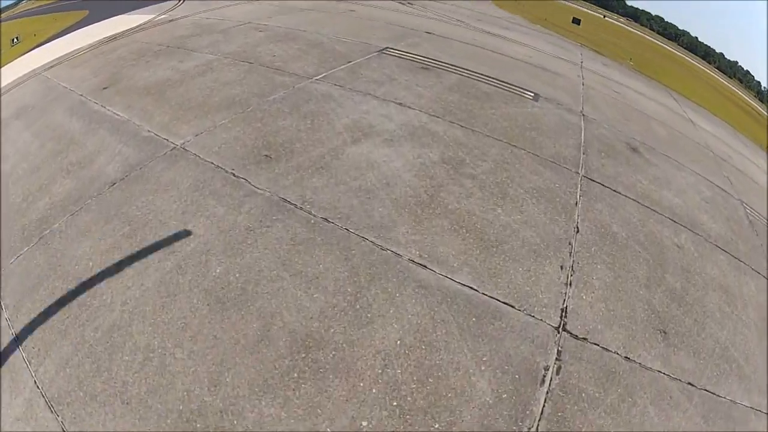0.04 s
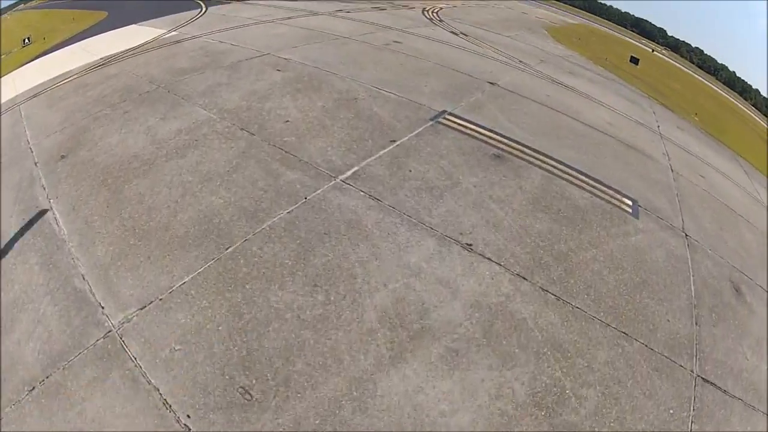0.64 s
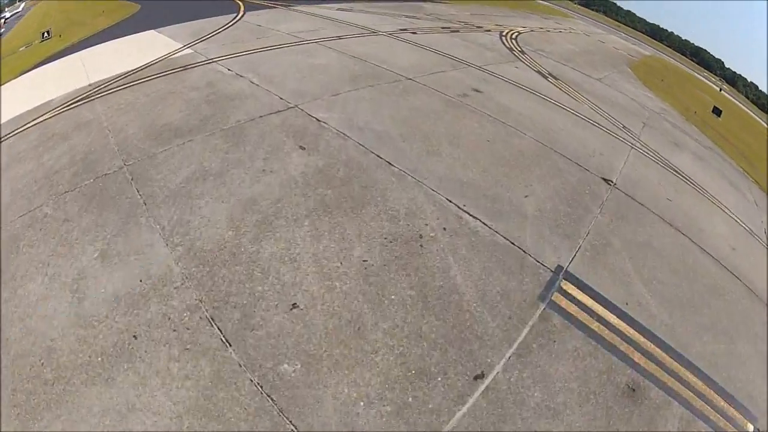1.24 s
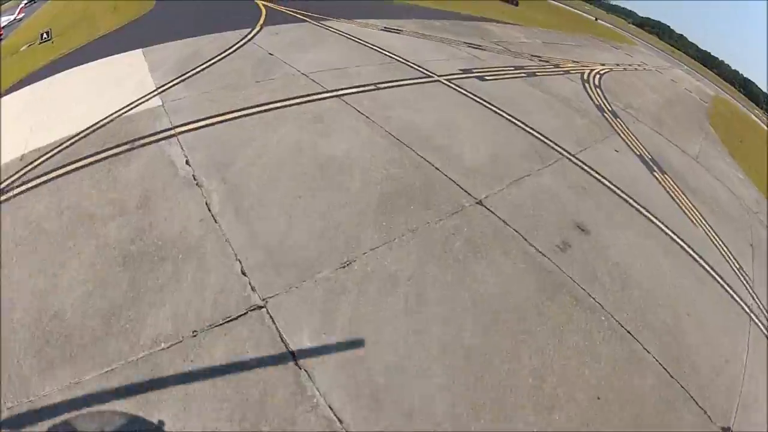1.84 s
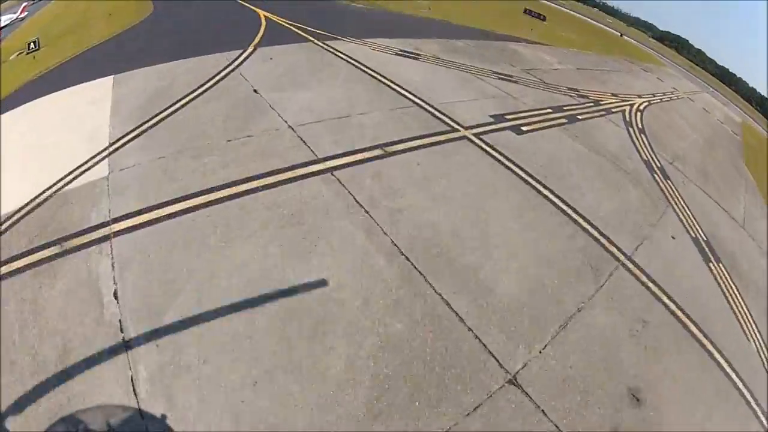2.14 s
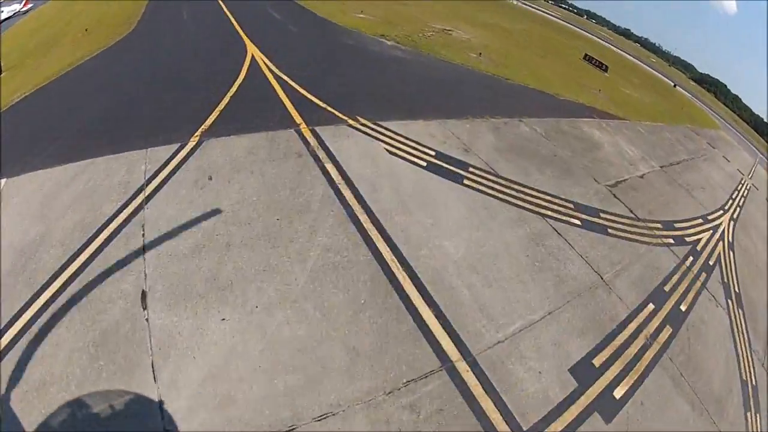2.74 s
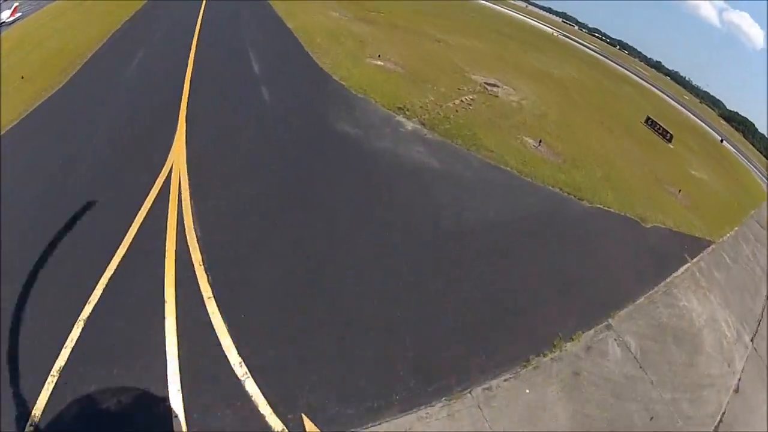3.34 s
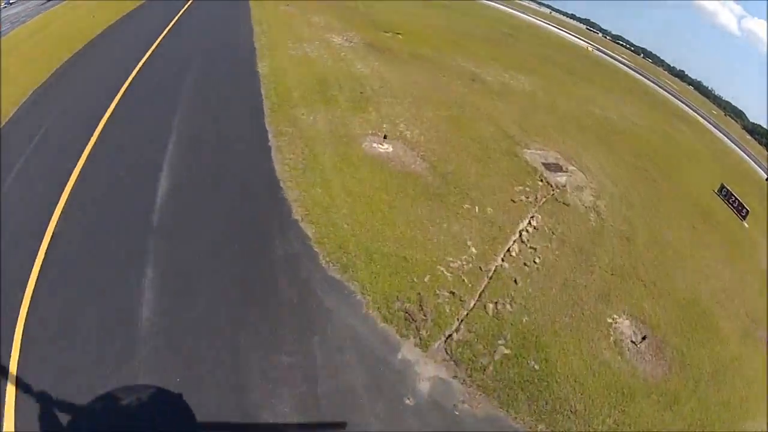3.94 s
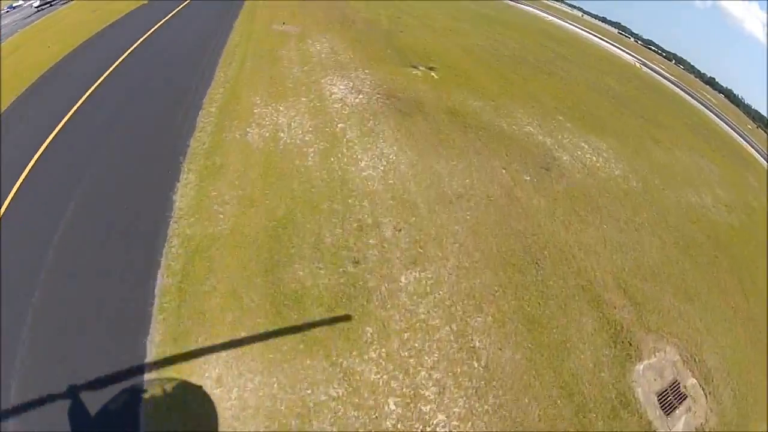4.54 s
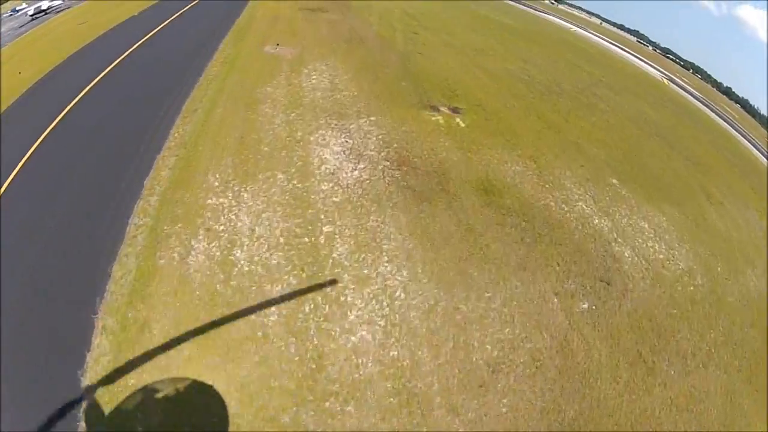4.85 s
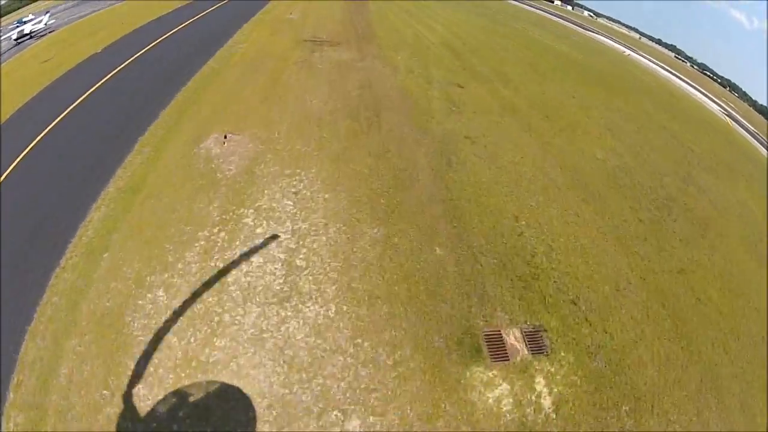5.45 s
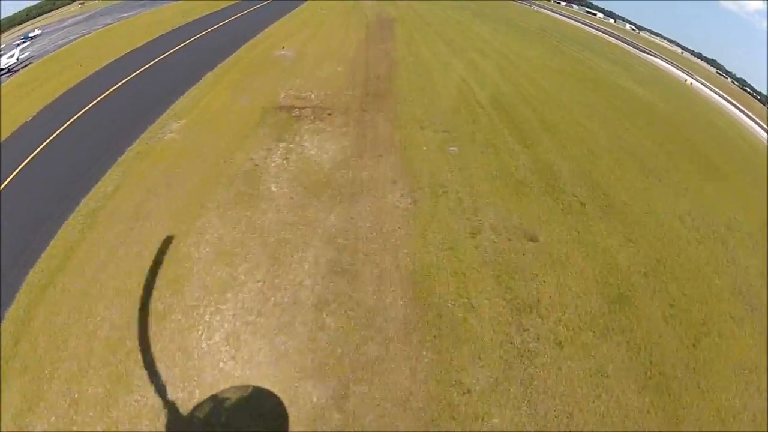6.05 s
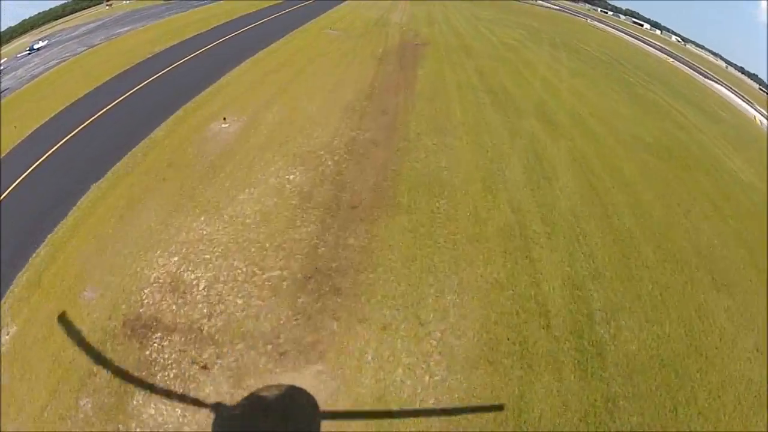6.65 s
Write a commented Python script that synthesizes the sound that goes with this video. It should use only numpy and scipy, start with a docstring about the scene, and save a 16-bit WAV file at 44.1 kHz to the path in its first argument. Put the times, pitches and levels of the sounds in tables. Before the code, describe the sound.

Rushing air and irregular thuds hit a small camera mounted outside a light helicopter as it rises from an airfield. Behind the gusts, the main blades beat rapidly, each with a thump and a hiss, and the exhaust and tail rotor drone. The wind briefly throbs with the blades, then smooths out as the chopping and drone swell and hold steady. The sound is close and slightly harsh.

```python
"""Downwash thuds and slaps on the microphone as a light two-bladed piston helicopter lifts off and climbs.
Each main blade passes with a thump and a swish, louder as the rotors work harder. Exhaust and tail rotor
drone, coloured by their ground echo. All is heard from a small camera on the hull, which limits the
peaks and samples coarsely, mirroring the sound into the treble."""
import sys
import numpy as np
from scipy import signal
from scipy.fft import rfft, irfft, next_fast_len
from scipy.io import wavfile
from scipy.ndimage import uniform_filter1d

SR = 44100
rng = np.random.default_rng(int(sys.argv[2]) if len(sys.argv) > 2 else 0)


def materialize(psi):
    """Save the field psi as 16-bit PCM at rate SR to the path in sys.argv[1].

    A 1-D psi becomes a single channel; in a 2-D psi each row is a channel.
    """
    bounded = np.clip(np.atleast_2d(psi).T, -1, 1)
    quanta = np.round(bounded * 32767).astype(np.int16)
    wavfile.write(sys.argv[1], SR, quanta)


N = 295470
TIME_S = np.arange(N) / SR
BLADE_HZ, FIRST_PASS_S = 13.694, .016


def blade_phase():
    """Position of the nearest main blade in passages: 0 overhead, -0.5 to 0.5."""
    return ((TIME_S - FIRST_PASS_S) * BLADE_HZ + .5) % 1 - .5


def blade_thump(effort_db, gain_db=-29):
    """Pressure dips ahead of a blade, rises under it and falls into suction behind it."""
    def lobe(at, width):
        return np.exp(-((blade_phase() - at) / width) ** 2)

    dip = lobe(at=-0.04, width=0.061)
    push = 1.4 * lobe(at=-0.0033, width=0.058)
    suction = 0.91 * lobe(at=0.21, width=0.08)
    pressure = push - dip - suction
    return from_db(gain_db + 0.98 * effort_db + 0.56 * drift(7.4)) * (pressure - pressure.mean())


# Blade hiss spectrum: (frequency [Hz], density [dB])
SWISH_SPECTRUM = [(300, -1), (1100, -5), (1800, -9.5), (2300, -4.5), (2700, 2), (3000, 2), (3450, -4),
                  (3900, 0.5), (4300, -2), (4700, -2), (5300, -8.5), (6000, -8.5)]


def blade_swish(effort_db, peak_db=-36, lag_s=0.0015, rise_s=0.023, fall_s=0.017):
    """Hiss swells with every blade, deeper under load, and tears as vortices break."""
    from_peak_s = blade_phase() / BLADE_HZ - lag_s
    width_s = np.where(from_peak_s < 0, rise_s, fall_s)
    swell = np.exp(-np.abs(from_peak_s / width_s) ** 2.12)
    depth_db = 14.5 + 0.31 * effort_db
    level_db = peak_db + effort_db + depth_db * (swell - 1)
    uneven_db = 1.3 * drift(15)
    tearing_db = 1.53 * drift(190)
    return from_db(level_db + uneven_db + tearing_db) * noise(SWISH_SPECTRUM)


# Exhaust lines, halves from the two cylinder banks: (multiple of firing rate [1], level [dB])
EXHAUST_LINES = [(1, 1.5), (1.5, -11), (2, -3.5), (2.5, -14.5), (3, -3.5), (3.5, -9), (4, -23.5),
                 (4.5, -31), (5, -16), (6, -29), (6.5, -26), (8, -28.5)]


def exhaust(effort_db, firing_hz=137.0, gain_db=-39.5):
    """The cylinders' firing pulses merge into a drone that grows with effort."""
    tone = drone(firing_hz, EXHAUST_LINES, sway=0.022, jitter_s=4e-5)
    return from_db(gain_db + 0.89 * effort_db) * tone


# Tail rotor lines: (multiple of its blade rate [1], level [dB])
TAIL_LINES = [(1, -1), (2, 2.5), (3, -2.5), (4, -5.5), (5, -15.5), (6, -24), (7, -28), (8, -28), (9, -32),
              (13, -25)]


def tail_rotor(effort_db, blade_hz=81.42, gain_db=-42):
    """The tail blades' fast pressure pulses drone from a little higher up."""
    tone = drone(blade_hz, TAIL_LINES, sway=.05, jitter_s=6e-5, above_m=.2)
    return from_db(gain_db + effort_db) * tone


# Climb above the ground: (time [s], height [m])
HEIGHT_M = [(0, 2.15), (.85, 2.49), (2.3, 3.15), (3.2, 3.75), (4.15, 4.14), (4.55, 4.4), (4.9, 4.62),
            (5.6, 5.0), (6.7, 5.12)]


def drone(rate_hz, lines, sway, jitter_s, above_m=0, echo_gain=0.73, sound_m_per_s=343):
    """Pulses smeared by the hull and shaken by moving air; the ground echo lifts and dips each line."""
    (height_m,) = curves(HEIGHT_M)
    echo_s = 2 * (height_m + above_m) / sound_m_per_s
    base_rad = 2 * np.pi * rate_hz * (TIME_S + jitter_s * drift(3.3))
    out = np.zeros(N)
    for (multiple, level_db), smear_rad in zip(lines, rng.uniform(0, 2 * np.pi, len(lines))):
        spread = sway * multiple
        phase_rad = multiple * base_rad + smear_rad + spread * drift(1.8)
        amplitude = from_db(level_db) * (1 + spread * drift(1.4))
        echo = echo_gain * np.cos(phase_rad - 2 * np.pi * multiple * rate_hz * echo_s)
        out += amplitude * (np.cos(phase_rad) + echo)
    return np.sqrt(2) * out


# Air over the hull: (time [s], level [dB], gustiness [dB])
HULL_AIRFLOW = [(0, -31, 0.5), (.7, -32, 4), (2.2, -31, 1), (2.85, -32.5, 3), (3.4, -31.5, 2.5),
                (4.1, -32, 1.5), (6.7, -33, 0)]
# Gusts near the ground, and brief dips in the rush as the limiter recovers from loud eddies:
# (time [s], level change [dB])
GUSTS_AND_DIPS = [(.25, -6.5), (.44, 0.5), (.97, 4), (1.22, 2), (1.45, 3.5), (1.7, 2), (2.03, 2.5),
                  (2.39, -7), (2.67, 2), (2.82, -3.5)]
# Rushing air spectrum: (frequency [Hz], density [dB])
WASH_SPECTRUM = [(40, -5), (70, -16.5), (130, -8), (280, 0.5), (450, -1), (650, -3), (800, -10.5),
                 (950, -19.5), (1500, -26), (2200, -27), (2900, -26.5), (3500, -40.5), (5500, -39.5)]


def downwash(change_width_s=0.049):
    """Air rushes over the hull and rumbles at the microphone, gusty low down, smoother in the climb."""
    air_db, gustiness_db = curves(HULL_AIRFLOW)
    change_db = sum(db * np.exp(-((TIME_S - at_s) / change_width_s) ** 2) for at_s, db in GUSTS_AND_DIPS)
    lumps = from_db(gustiness_db * drift(90) - gustiness_db ** 2 * np.log(10) / 20)  # mean power 1
    rush = from_db(air_db + change_db + throb_db()) * lumps * noise(WASH_SPECTRUM)
    return rush + port_rumble(gustiness_db)


def throb_db(start_s=2.27, end_s=3.69, fade_s=0.027, in_step_s=3.51, swing_db=4, rest_db=-0.03):
    """The downwash beats with the blades while the craft gathers speed; the beat slips steadily later."""
    gate = (np.tanh((TIME_S - start_s) / fade_s) - np.tanh((TIME_S - end_s) / fade_s)) / 2
    slip_passages = 0.35 * (np.clip(TIME_S, start_s, end_s) - in_step_s)
    return (rest_db + swing_db * gate) * np.cos(2 * np.pi * (blade_phase() - slip_passages))


# Eddies striking the microphone: (time [s], peak level [dB], pitch [Hz])
EDDY_HITS = [(.034, -5.5, 113), (.116, -3.5, 168), (.152, -15.5, 444), (.185, -19.5, 122),
             (.214, -15, 87.5), (.324, -18.5, 146), (0.337, -12, 250), (.472, -18, 450), (.663, -8, 466),
             (1.065, -7, 460), (1.237, -16, 480), (1.865, -18, 355), (2.084, -17, 314), (2.158, -16, 348),
             (2.310, -16, 505), (2.336, -10, 443), (2.405, -19.5, 490), (2.487, -20, 393), (2.683, -7, 484),
             (2.773, -12.5, 490), (3.077, -11.5, 545)]


def eddies(width_cycles=0.53, raggedness=0.14):
    """Each eddy shoves the air at the port to and fro for a cycle or two: big ones thud, small slap."""
    out = np.zeros(N)
    rough = raggedness * noise(WASH_SPECTRUM)
    for (at_s, peak_db, pitch_hz), phase_cycles in zip(EDDY_HITS, rng.random(len(EDDY_HITS))):
        width_s = width_cycles / pitch_hz
        near = np.abs(TIME_S - at_s) < 4 * width_s
        from_peak_s = TIME_S[near] - at_s
        envelope = from_db(peak_db) * np.exp(-(from_peak_s / width_s) ** 2)
        shove = np.sin(2 * np.pi * (pitch_hz * from_peak_s + phase_cycles))
        out[near] += envelope * (shove + rough[near])
    return out


# Turbulence at the microphone port: (time [s], level [dB])
RUMBLE_DB = [(.3, -38), (.6, -34), (1.0, -34), (1.12, -36), (1.8, -35.5), (2.4, -41), (2.8, -42.5),
             (3.5, -44), (3.9, -34.5), (4.7, -33), (6.7, -31.5)]
# Turbulence spectrum: (frequency [Hz], density [dB])
RUMBLE_SPECTRUM = [(14, -2), (35, -16), (70, -1.5), (130, -1.5), (220, 1), (370, -8.5), (600, -25),
                   (1200, -32.5)]


def port_rumble(gustiness_db):
    """Deep turbulence at the microphone port, wavering with the gustiness."""
    (level_db,) = curves(RUMBLE_DB)
    return from_db(level_db + gustiness_db * drift(11)) * noise(RUMBLE_SPECTRUM)


def from_db(db):
    return 10 ** (np.asarray(db) / 20)


def unit_rms(x):
    return x / np.sqrt(np.mean(x ** 2) + 1e-20)


def curves(rows):
    """A time table's value columns at every sample."""
    times_s, *columns = np.transpose(rows)
    return [np.interp(TIME_S, times_s, column) for column in columns]


def drift(rate_hz, hop=40, settle=2000):
    """Smooth random wander below about rate_hz; rms 1."""
    pole = np.exp(-2 * np.pi * rate_hz * hop / SR)
    white = rng.standard_normal(N // hop + settle + 2)
    slow = signal.lfilter([1], [1, -2 * pole, pole * pole], white)[settle:]
    return np.interp(np.arange(N) / hop, np.arange(len(slow)), unit_rms(slow))


def noise(spectrum):
    """Noise with the given spectrum, rolled off beyond both ends; rms 1."""
    hz, db = np.transpose(spectrum)
    size = next_fast_len(N)
    bin_hz = np.arange(size // 2 + 1) * SR / size + 1e-6
    gain = from_db(np.interp(np.log(bin_hz), np.log(hz), db))
    gain /= np.sqrt(1 + (hz[0] / bin_hz / 2) ** 4 + (bin_hz / hz[-1] / 1.3) ** 12)
    return unit_rms(irfft(rfft(rng.standard_normal(size)) * gain, size)[:N])


# Rotor effort relative to the steady climb: (time [s], level [dB])
EFFORT_DB = [(.15, -12.5), (.4, -9), (.85, -3.8), (1.04, -3), (1.13, -8.5), (1.6, -11), (2.0, -7.5),
             (2.8, -10), (3.02, -3), (3.65, -4.5), (4.1, 1.5), (4.65, 0), (5.05, 1.1), (5.45, -0.8),
             (5.8, -0.2), (6.7, -1.6)]


def scene():
    """Main rotor, exhaust, tail rotor and moving air at one microphone."""
    (effort_db,) = curves(EFFORT_DB)
    drones = exhaust(effort_db) + tail_rotor(effort_db)
    main_rotor = blade_thump(effort_db) + blade_swish(effort_db)
    return (main_rotor + drones + downwash() + eddies())[None]


def limiter(x, ceiling, release_db_per_s=153):
    """Peaks over the ceiling pull the gain down at once; it recovers steadily."""
    over_db = 20 * np.log10(np.maximum(np.abs(x) / ceiling, 1))
    ramp_db = release_db_per_s * TIME_S
    cut_db = np.maximum.accumulate(over_db + ramp_db, axis=-1) - ramp_db
    return x * from_db(-uniform_filter1d(cut_db, size=24, axis=-1))


def record(dry):
    """The camera limits, samples and holds at 12 kHz, mirroring the sound upward, then cuts the top."""
    ceiling = 0.15
    at_12khz = signal.resample_poly(limiter(dry, ceiling), 40, 147, axis=-1)
    held_48khz = np.repeat(np.clip(at_12khz, -ceiling, ceiling), 4, axis=-1)
    mirrored = signal.resample_poly(held_48khz, 147, 160, axis=-1)[:, :N]
    lowpass = signal.ellip(12, .2, 80, 15300, fs=SR, output="sos")
    return signal.sosfilt(lowpass, mirrored)


dry = scene()
out = record(dry)
materialize(out)
```